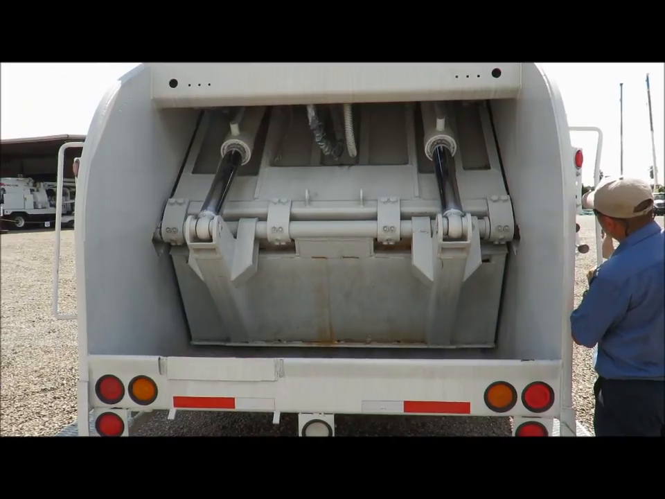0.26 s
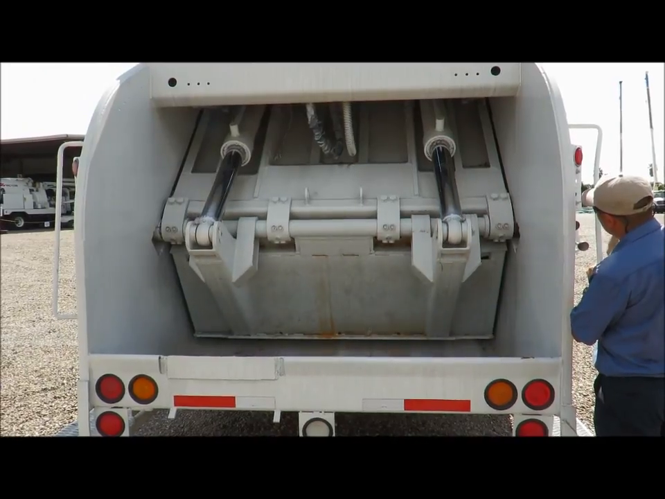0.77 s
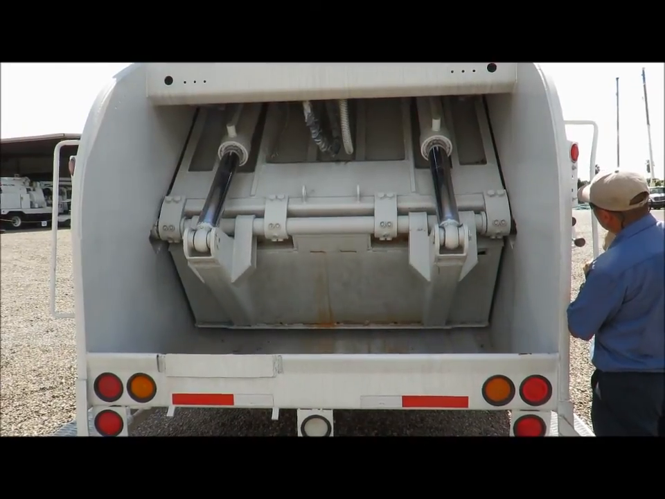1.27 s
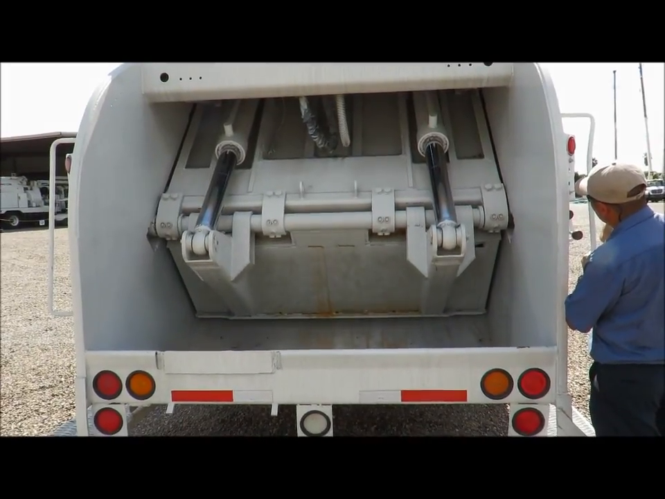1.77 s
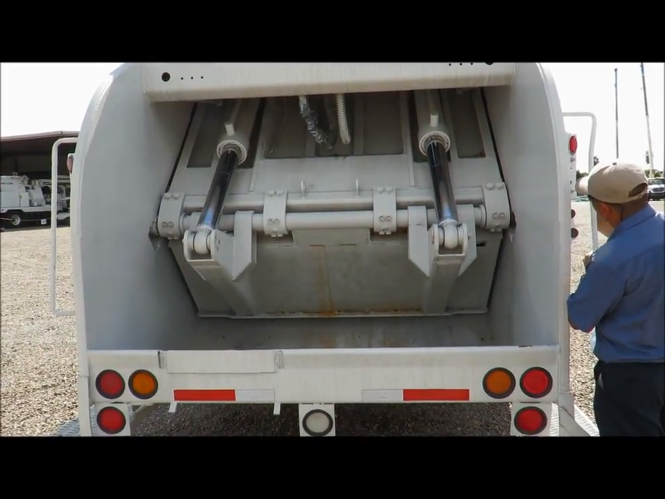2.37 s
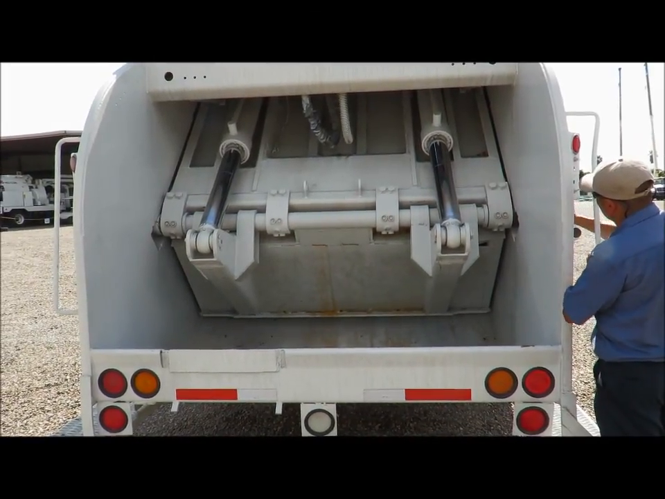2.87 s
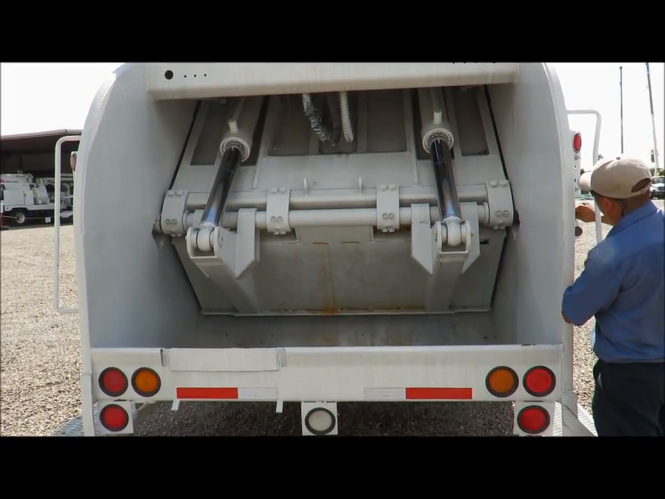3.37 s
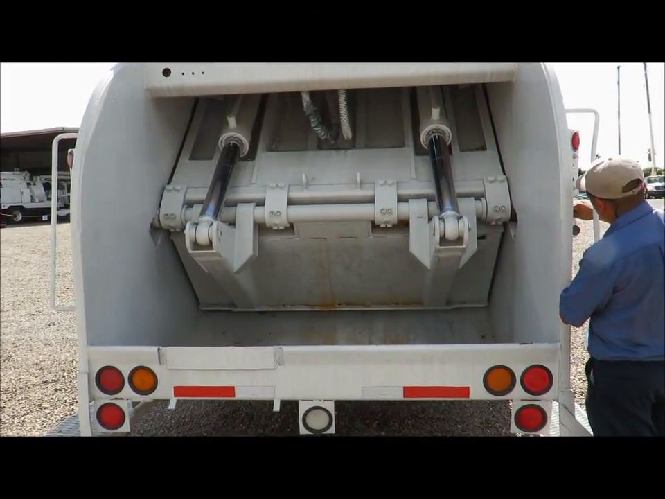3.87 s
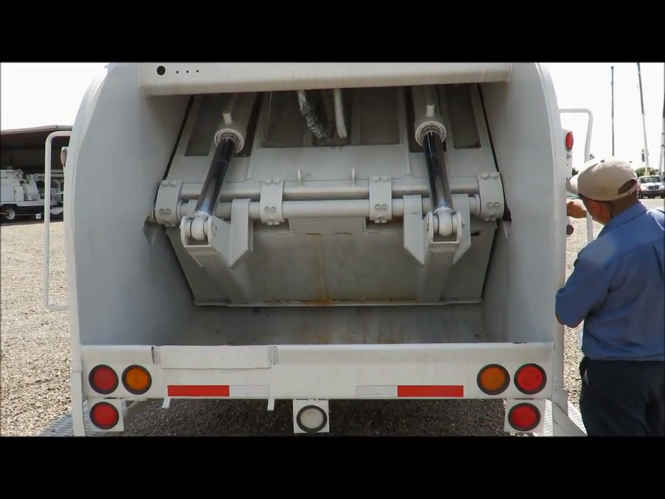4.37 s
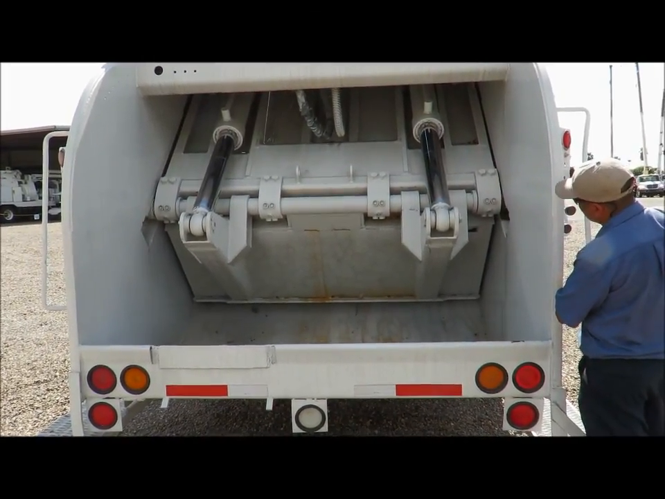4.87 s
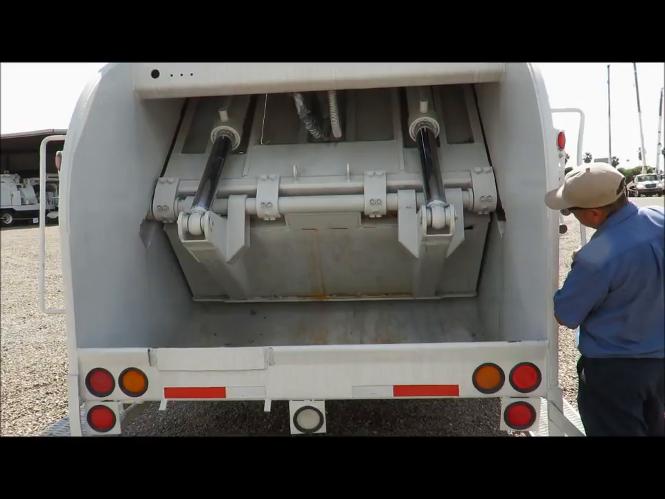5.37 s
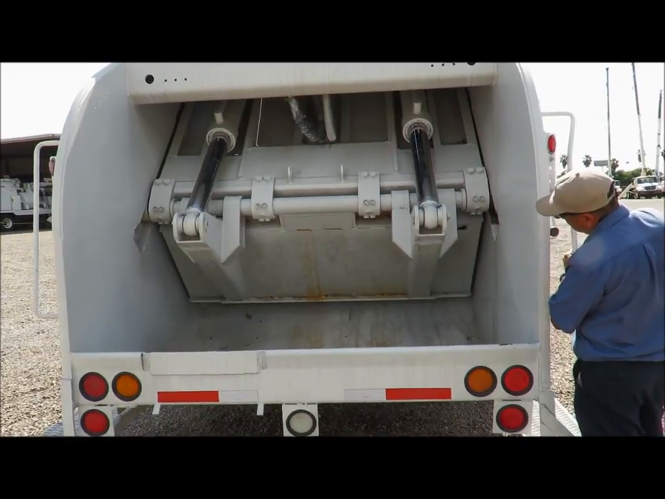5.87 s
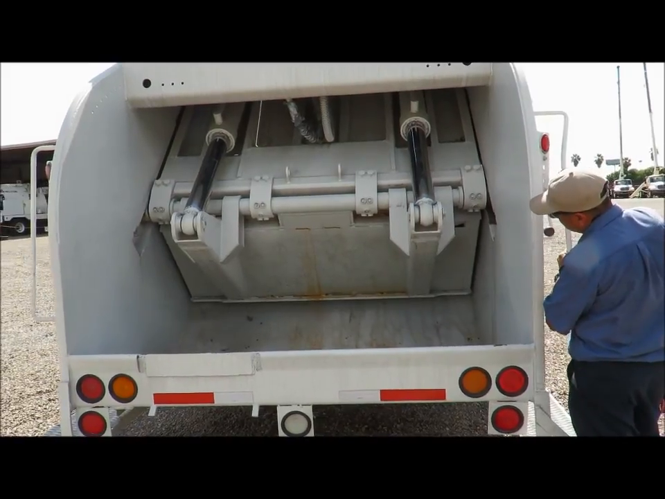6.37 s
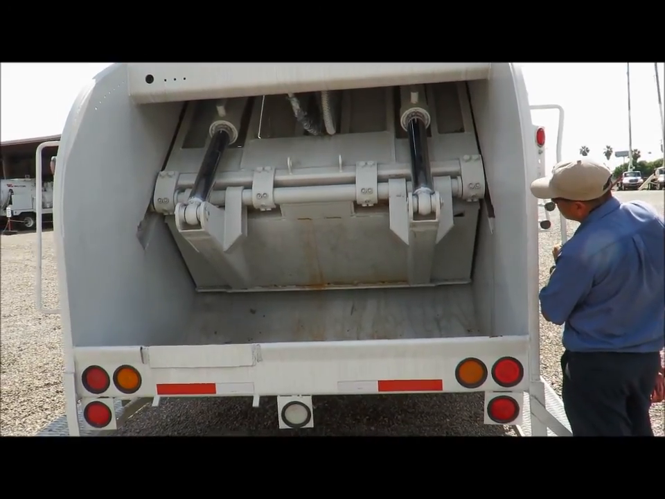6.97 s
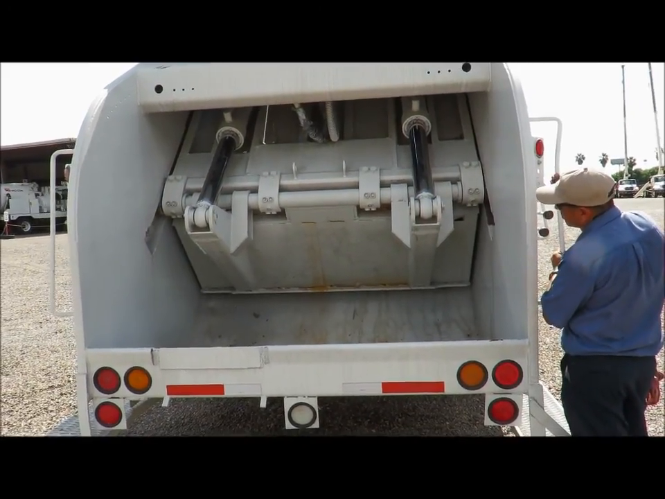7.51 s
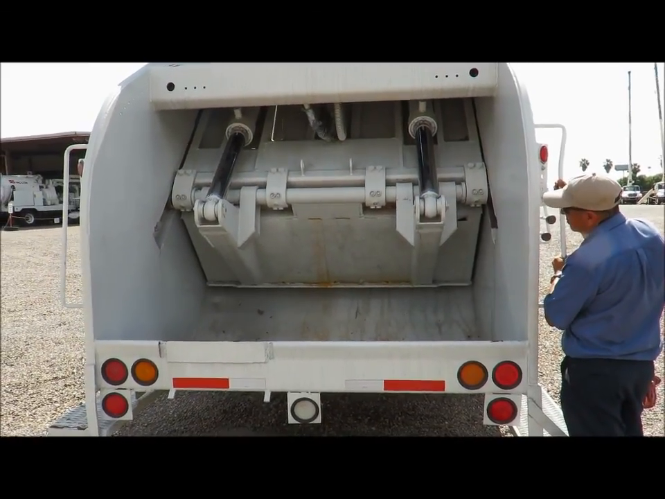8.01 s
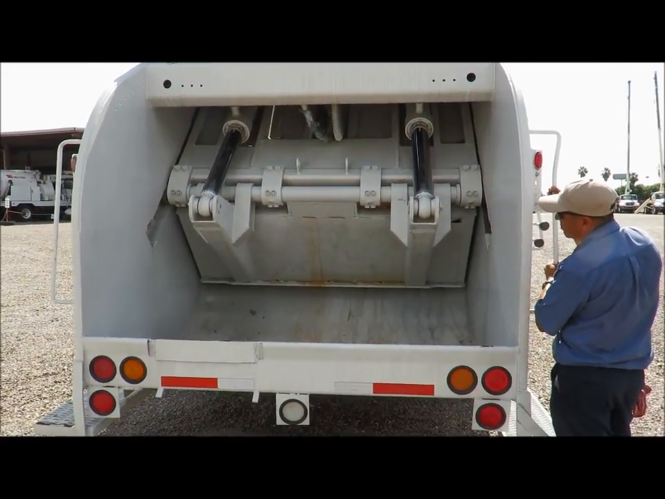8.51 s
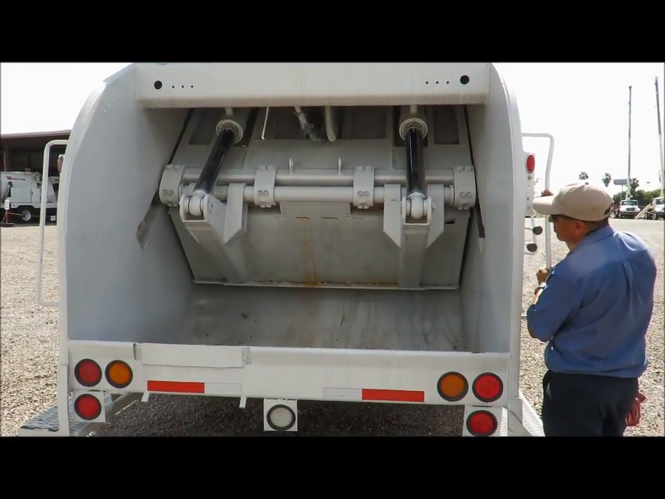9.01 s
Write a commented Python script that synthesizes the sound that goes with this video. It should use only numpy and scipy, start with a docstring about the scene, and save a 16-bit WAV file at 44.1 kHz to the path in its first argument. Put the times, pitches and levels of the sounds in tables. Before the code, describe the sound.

A steady low engine rumble and pump hum fill an open yard, heard from a few metres behind the truck. Metal knocks build to a loud hopper clank and hissing oil, then a lighter knock, another bright crash and a rough scraping groan. Afterwards the drone settles and continues evenly, broken by a single soft body thud, with small high bird chirps faint above it.

```python
"""A diesel at raised idle drives a droning hydraulic pump, heard behind a rear-loading garbage truck. Pump and
engine are harmonic series locked to one shaft, with broadband rumble, clatter and oil flow. Turbulent oil
hisses and whistles through valves; the packer blade strikes the steel hopper (shaped noise bursts) in two main
groups of clanks. Near 3.7 s a groan swells out of scraping noise and fades back (a gliding harmonic series in
noise). Dull body thuds are decaying sines, and a small bird chirps in the yard as frequency-swept sines."""
import sys
import numpy as np
from scipy import signal
from scipy.fft import rfft, irfft, next_fast_len
from scipy.io import wavfile
from scipy.ndimage import uniform_filter1d, map_coordinates

SR = 44100
rng = np.random.default_rng(int(sys.argv[2]) if len(sys.argv) > 2 else 0)


def dump(signal):
    """Clip the signal to [-1, 1] and save it as 16-bit WAV at the path in sys.argv[1]."""
    limited = np.clip(np.atleast_2d(signal).T, -1, 1)
    pcm = np.round(limited * 32767).astype(np.int16)
    wavfile.write(sys.argv[1], SR, pcm)


N = 407925
TOP_HZ = 15750  # upper band limit


def amp(db):
    """Level definition: decibels to amplitude gain."""
    return 10 ** (np.asarray(db) / 20)


def unit(x):
    """Normalisation: scale to rms 1."""
    return x / np.sqrt(np.mean(x ** 2) + 1e-20)


def clock():
    """Sampling: the time of each sample in seconds."""
    return np.arange(N) / SR


def along(points, hz):
    """Logarithmic frequency scale: interpolate (f/Hz, value) points."""
    f, v = np.transpose(points)
    return np.interp(np.log(hz + 1), np.log(f + 1), v)


def curves(rows):
    """Linear interpolation in time: one signal for each column after t/s."""
    s, *columns = np.transpose(rows)
    return [np.interp(clock(), s, column) for column in columns]


def wobble(rate):
    """Band-limited random fluctuation: a smooth curve through `rate` random knots a second."""
    knots = rng.standard_normal(1024)
    coarse = clock()[::64]
    smooth = map_coordinates(knots, [coarse * rate], mode="mirror")
    return np.interp(clock(), coarse, smooth)


def angle(hz):
    """Phase is the time integral of a moving frequency."""
    return 2 * np.pi * np.cumsum(hz) / SR


def tone(phase, waver):
    """Quadrature modulation: a sine of rms about 1 whose strength and phase waver."""
    start = rng.uniform(0, 2 * np.pi)
    in_phase = (1 + waver * wobble(17)) * np.sin(phase + start)
    quadrature = waver * wobble(17) * np.cos(phase + start)
    return np.sqrt(2) * (in_phase + quadrature)


def held(t, length, rise, t60):
    """Exponential decay: a straight rise, a hold until length, then a fall of 60 dB in t60."""
    return np.clip(t / rise, 0, 1) * amp(-60 * np.maximum(t - length, 0) / t60)


def filtered(x, response):
    """Linear filtering: the spectrum of x times a frequency response."""
    n = x.shape[-1]
    m = next_fast_len(n + 8192)
    return irfft(rfft(x, m) * response(np.fft.rfftfreq(m, 1 / SR)), m)[..., :n]


def colour(points):
    """Spectral envelope: a response through (f/Hz, level/dB) points."""
    return lambda hz: amp(along(points, hz))


def tilted(response, tilt_db):
    """Spectral tilt: a response changed by tilt_db per octave."""
    return lambda hz: response(hz) * amp(tilt_db * np.log2(hz + 20))


def speckled(response, depth_db, spacing_hz):
    """Modal density: a response with the many narrow peaks and dips of a steel body."""
    knots = rng.standard_normal(4096)
    return lambda hz: response(hz) * amp(depth_db * np.interp(hz / spacing_hz, np.arange(len(knots)), knots))


# left-right likeness of diffuse sound: f/Hz, correlation (1 = mono)
LIKENESS = [(60, .998), (200, .99), (550, .96), (1650, .92), (5000, .76), (15000, .45)]


def noise(response, size, width=1):
    """Diffuse-field correlation: coloured stereo noise of rms 1, near mono in the bass."""
    def spread(hz):
        turn = width * np.arccos(np.clip(along(LIKENESS, hz), -1, 1)) / 2
        return response(hz) * np.array([np.cos(turn), np.sin(turn)])
    mid, side = filtered(rng.standard_normal((2, size)), spread)
    return unit(np.array([mid + side, mid - side]))


# bird phrases: t/s at the top of the first note, number of notes, level/dB,
# drop per note as a share of the first pitch
BIRD_PHRASES = [(.016, 2, -40, .085), (.457, 2, -41, 0.11), (1.015, 2, -43, .12), (2.507, 3, -51, .08),
                (3.11, 1, -45.5, 0), (3.917, 2, -49.5, .13), (5.169, 2, -44, 0.11), (5.625, 3, -44, .03),
                (6.344, 2, -45, 0.11), (6.897, 3, -46.5, 0.1), (7.584, 2, -42.5, .11),
                (8.018, 3, -42.5, 0.056), (8.617, 3, -43.5, .02), (9.203, 1, -41.5, 0)]
# shape of one note: t/s from its top, share of the top pitch, level/dB
BIRD_NOTE = [(-.048, .6, -20), (-.034, .66, -1), (-.021, .73, -1), (-.012, .9, -6), (-.004, 1, -1),
             (.006, .99, -2), (.017, .88, -8), (.032, .7, -18)]
BIRD_HZ, NOTE_GAP_S = 6045, .096  # top of a first note before quaver; spacing of the notes
LAST_NOTE_DB, FLUTTER_DB = -4, 2  # a third note is weaker; random flutter within a note
BIRD_ECHO_DB, BIRD_ECHO_T60_S = -1, 0.12


def bird():
    """Frequency modulation: arched whistles in groups of one to three, with a diffuse echo from the yard."""
    song = np.zeros(N)
    when, share, shape_db = np.transpose(BIRD_NOTE)
    t = np.arange(when[0], when[-1], 1 / SR)
    arch = uniform_filter1d(np.interp(t, when, share), size=300)
    for s, notes, db, drop in BIRD_PHRASES:
        for k in range(round(notes)):
            quaver = 1 + 0.015 * np.sin(2 * np.pi * rng.uniform(180, 320) * t)
            flutter = signal.resample(rng.standard_normal(size=16), len(t))
            level_db = db + LAST_NOTE_DB * (k == 2) + np.interp(t, when, shape_db) + FLUTTER_DB * flutter
            pitch_hz = BIRD_HZ * (1 - drop * k) * arch * quaver
            note = amp(level_db) * np.sin(angle(pitch_hz))
            song += np.interp(clock(), s + k * NOTE_GAP_S + t, note, left=0, right=0)
    # the echo is a decaying noise tail, different in each ear
    tail = rng.standard_normal((2, SR // 2)) * amp(-60 * clock()[:SR // 2] / BIRD_ECHO_T60_S)
    echo = signal.fftconvolve(song[None], tail / np.linalg.norm(tail[0]), axes=1)
    return song + amp(BIRD_ECHO_DB) * echo[:, :N]


# dull thuds of the body: t/s, level/dB, f/Hz, decay t60/s
BODY_THUDS = [(1.661, -14, 324, 0.33), (1.681, -29.5, 68.7, 0.62), (3.271, -22.5, 61.7, 0.32),
              (6.612, -10.5, 106.5, 0.2)]


def thuds():
    """Damped free vibration: shifts of load set a large panel swinging for a moment."""
    out = np.zeros(N)
    for s, db, hz, t60 in BODY_THUDS:
        age = np.maximum(clock() - s, 0)
        swing = tone(2 * np.pi * hz * age, waver=0.12)
        out += amp(db - 60 * age / t60) * (1 - np.exp(-age / .012)) * swing
    return out


# spectrum of the oil jet: f/Hz, relative level/dB per Hz
OIL_JET = [(350, -29.5), (700, -5), (1200, -6.5), (2200, -3), (3200, -6), (4500, -9), (6300, -11.5),
           (7500, -12.5), (12000, -12), (14500, -14.5), (15700, -20.5)]
# valve openings: start t/s, end t/s, level/dB, die-away t60/s, tilt/dB per octave
VALVE_OPENINGS = [(0, 0.203, -50.5, .58, 1), (1.711, 1.77, -37, .11, -1.5), (1.766, 2.043, -30, 0.56, 0),
                  (2.858, 2.957, -44.5, .94, 0.5), (3.069, 3.183, -46.5, .2, 0),
                  (3.171, 3.351, -36.5, .13, -1), (3.301, 3.336, -22.5, .16, 3),
                  (3.492, 3.868, -34.5, .15, -0.2), (3.988, 4.144, -53, 0.18, 3)]
VALVE_RISE_S = 0.035


def valves():
    """Turbulent jet noise: oil forced through the spool hisses, then dies as the pressure falls."""
    out, t = np.zeros((2, N + SR)), np.arange(SR) / SR
    jet = speckled(colour(OIL_JET), depth_db=3.0, spacing_hz=114.6)
    for start, end, db, t60, tilt_db in VALVE_OPENINGS:
        opening = amp(db) * held(t, end - start, VALVE_RISE_S, t60)
        hiss = noise(tilted(jet, tilt_db), SR, width=.65)
        out[:, max(round(start * SR), 0):][:, :SR] += opening * hiss
    return out[:, :N] * amp(0.93 * wobble(27))


# oil whistling at the valve edge: start t/s, end t/s, start f/Hz, end f/Hz, level/dB
EDGE_WHISTLES = [(1.698, 1.77, 14360, 14600, -43), (2.892, 2.95, 14430, 14700, -42.5),
                 (3.173, 3.339, 4440, 4630, -37)]


def whistles():
    """Edge tone: a nearly shut valve sings with a fluttering pitch."""
    out, t = np.zeros(N), clock()
    for start, end, hz0, hz1, db in EDGE_WHISTLES:
        phase = angle(np.interp(t, [start, end], [hz0, hz1]) * (1 + 0.011 * wobble(900)))
        gate = np.clip(np.minimum(t - start, end - t) / 0.032, 0, 1)
        overtone = amp(-12) * (2 * hz1 < TOP_HZ) * np.sin(2 * phase)
        out += amp(db + 1.5 * wobble(110)) * gate * (np.sin(phase) + overtone)
    return out


# hopper plate resonances: centre f/Hz, width f/Hz, level/dB
HOPPER_PLATES = [(480, 140, -13), (717, 87, 3.5), (753, 32, 7.5), (1110, 52, -11.5), (1700, 60, -21.5),
                 (1870, 53, -25), (2520, 60, -22)]


def plates(hz):
    """Modal superposition: the hopper plates as a sum of damped resonances of alternating sign."""
    total = 0
    for k, (centre, width, db) in enumerate(HOPPER_PLATES):
        damping = 1j * hz * width
        total = total + (-1) ** k * amp(db) * damping / (centre * centre - hz * hz + damping)
    return total


# dense ring of the steel: f/Hz, relative level/dB per Hz
STEEL_RING = [(150, -26), (400, -3), (700, -2), (1150, -3.5), (1480, -3.5), (2050, 2.5), (2900, -7),
              (3600, -14.5), (4900, -18), (6500, -32.5), (15000, -34)]
# pitch of the groan: t/s, f/Hz
GROAN_PITCH = [(3.46, 177), (3.59, 170), (3.65, 165.5), (3.72, 163.5), (3.78, 163.5), (3.87, 167)]
# colour of the groan: f/Hz, relative level/dB of a harmonic
GROAN_BODY = [(165, -10.5), (330, -6), (495, -2), (660, 0), (820, 2.5), (985, -7), (1150, -11),
              (1310, -6.5), (1470, -8), (1640, 0), (1800, -17), (1970, -11), (2330, -8.5), (2620, -23),
              (2790, -12), (3000, -19), (3780, -23), (5000, -30)]
GROAN_S, GROAN_WIDTH_S, GROAN_DB = 3.71, 0.16, -18.5  # middle, half-length and level of its swell
SCRAPE_START_S, SCRAPE_END_S, SCRAPE_RISE_S, SCRAPE_T60_S = 3.485, 3.87, .05, 0.31
SCRAPE_DB, SCRAPE_YIELD_DB = -24.5, 13.5  # dry scraping, and how far it gives way to the groan
SCRAPE_ROUGH_DB, SCRAPE_CATCH_RATE = 3, 110  # the steel catches and slips; random knots a second


def groan(count=32):
    """Harmonic series in noise: scraping swells into a gliding groan, which fades back into scraping."""
    on = np.abs(clock() - GROAN_S) < .5
    t, hz = clock()[on], curves(GROAN_PITCH)[0][on]
    phase = angle(hz * (1 + 0.0021 * wobble(60)[on]))
    lock = np.exp(-((t - GROAN_S) / GROAN_WIDTH_S) ** 2)
    # each harmonic swells and fades as it glides across fixed resonances
    body = colour(GROAN_BODY)
    lines = sum(body(k * hz) * np.sin(k * phase + rng.uniform(0, 2 * np.pi)) for k in range(1, count))
    groaning = amp(GROAN_DB) * lock * unit(lines)
    scrape = noise(lambda f: colour(STEEL_RING)(f) + 2.0 * np.abs(plates(f)), len(t), width=.7)
    sliding = held(t - SCRAPE_START_S, SCRAPE_END_S - SCRAPE_START_S, SCRAPE_RISE_S, SCRAPE_T60_S)
    sliding = sliding * amp(SCRAPE_ROUGH_DB * wobble(SCRAPE_CATCH_RATE)[on])
    out = np.zeros((2, N))
    out[:, on] = groaning + amp(SCRAPE_DB - SCRAPE_YIELD_DB * lock ** 2) * sliding * scrape
    return out


SNAP_S, SNAP_DB, SNAP_T60_S = 3.337, -5.5, 0.016
SNAP_TILT_DB = 4.5  # brightness, dB per octave


def snap():
    """Impulsive contact: steel seats on steel with one very short, bright burst."""
    age = clock() - SNAP_S
    burst = noise(tilted(np.ones_like, SNAP_TILT_DB), N, width=.8)
    return amp(SNAP_DB) * held(age, .001, .001, SNAP_T60_S) * burst


# blade against the hopper: t/s, level/dB, plate boom level/dB against it, base ring t60/s
BLADE_BLOWS = [(1.665, -27.5, -11.5, 0.18), (1.692, -29.5, -10.5, 0.12), (1.771, -24.5, -15.5, 0.13),
               (1.985, -8, -16, .2), (2.012, -18.5, -3, .24), (2.038, -21, 2.5, 0.41), (2.6, -33, 3, 0.24),
               (2.897, -23.5, -7, .14), (3.313, -10.5, -4, 0.18), (3.334, -12.5, 4, .1),
               (3.85, -29, 8, 0.37)]
# damping of the steel: f/Hz, multiple of the base ring time
STEEL_DAMPING = [(300, 3.2), (800, 2.7), (2000, 0.99), (5000, 1.3), (12000, 0.64)]
HARD_BLOW_DB, BRIGHTENS = -11, .17  # softer blows are duller: dB per octave for each dB below a hard blow
CRACK_DB, CRACK_GROWS, CRACK_T60_S = -13.5, .8, .018  # level at a hard blow; dB per dB of force
AFTERRING_DB, AFTERRING_T60_S = -20.5, 1  # the whole hopper rings on; t60 before damping
CONTACT_S, CONTACT_SLOWS = 0.0016, 0.73  # rise of a hard blow's ring; dB of time per dB softer


def clanks():
    """Impact excitation: crack, dense steel ring with frequency-dependent damping, and plate boom."""
    out, t = np.zeros((2, N + SR)), np.arange(SR) / SR
    steel = speckled(colour(STEEL_RING), depth_db=3.5, spacing_hz=30.47)
    for s, db, boom_db, t60 in BLADE_BLOWS:
        force_db = db - HARD_BLOW_DB
        # fade every frequency band of the ring at its own rate
        struck = noise(tilted(steel, BRIGHTENS * force_db), SR, width=0.75)
        hz, age, bands = signal.stft(struck, SR, nperseg=256)
        fade_db = -60 * age / along(STEEL_DAMPING, hz)[:, None]
        decay = amp(fade_db / t60) + amp(AFTERRING_DB + fade_db / AFTERRING_T60_S)
        ring = signal.istft(bands * decay, SR, nperseg=256)[1][:, :SR]
        # the boom has a main decay and a weaker tail
        boom_decay = amp(boom_db - 60 * t / (t60 * 0.89)) + amp(boom_db - 8.0 - 60 * t / 0.5)
        boom = noise(plates, SR, width=.7) * boom_decay
        crack_db = CRACK_DB + CRACK_GROWS * force_db - 60 * t / CRACK_T60_S
        crack = amp(crack_db) * noise(np.ones_like, SR, width=.6)
        rise = 1 - np.exp(-t / (CONTACT_S * amp(-CONTACT_SLOWS * force_db)))
        out[:, round(s * SR):][:, :SR] += amp(db) * (crack + (ring + boom) * rise)
    return out[:, :N]


# exhaust lines: multiple of the crank rate, level/dB against the drone
EXHAUST_LINES = [(3, -18), (4.5, -11), (5, -19.5), (5.5, -13.5), (6, -8), (7, -18.5), (8, -16.5), (9, -8.5),
                 (11, -12.5), (12, 0.5), (13, -11.5), (15, -33.5), (18, -19.5), (24, -22.5)]
# engine rumble: f/Hz, relative level/dB per Hz
RUMBLE_SPECTRUM = [(20, -44.5), (32, -21), (55, -2.5), (100, 0), (165, 4), (260, -1.5), (330, -2.5),
                   (450, -11), (700, -43), (1500, -84)]
# engine clatter: f/Hz, relative level/dB per Hz
CLATTER_SPECTRUM = [(250, -36), (430, -11.5), (472, -7.5), (556, -8.5), (603, -6), (647, -5.5), (808, -5.5),
                    (940, -11), (1020, -12.5), (1320, -16.5), (1810, -18.5), (3130, -29), (4000, -32.5),
                    (5880, -41), (7000, -46.5), (9100, -76), (15400, -120)]
# rush of oil: f/Hz, relative level/dB per Hz
FLOW_SPECTRUM = [(2500, -28.5), (5000, -4), (7000, 0.5), (9200, 0.5), (10200, -4.5), (14000, -4),
                 (16000, -8.5)]
# slow drift of the engine's loudness: t/s, level/dB
ENGINE_DRIFT = [(0, 3.5), (.2, 3), (.7, -0.5), (1.5, -1), (1.85, 3), (2.3, -.5), (4.7, 0.4), (7.2, 0.5),
                (8.3, 2.36), (9.25, 2.5)]
HUM_REFERENCE_DB = -12.5  # level of a steady hum
# layers at the reference hum before the drift (dB), and how they dip with the hum (dB per dB)
DRONE_DB, DRONE_FOLLOW = -23.5, 0.46
RUMBLE_DB, RUMBLE_FOLLOW = -24, 0.017
CLATTER_DB, CLATTER_FOLLOW = -31, 0.18
FLOW_DB, FLOW_FOLLOW = -59.5, .35


def diesel(crank, hum_db):
    """Periodic combustion: exhaust orders, rumble, clatter and oil rush, each dipping a little with the hum."""
    drift_db, = curves(ENGINE_DRIFT)
    change_db = uniform_filter1d(hum_db - HUM_REFERENCE_DB, size=SR // 4)
    orders = sum(amp(db) * tone(k * crank, waver=.16) for k, db in EXHAUST_LINES)
    exhaust = amp(DRONE_DB + DRONE_FOLLOW * change_db) * orders
    rumble = amp(RUMBLE_DB + RUMBLE_FOLLOW * change_db) * noise(colour(RUMBLE_SPECTRUM), N)
    # valves and injectors add a faint pattern that repeats every engine cycle of two turns
    cycle = rng.standard_normal(SR // 10)
    pattern = np.interp(crank / (4 * np.pi), np.arange(len(cycle)) / len(cycle), cycle, period=1)
    body = speckled(colour(CLATTER_SPECTRUM), depth_db=2.0, spacing_hz=29.56)
    ticking = unit(noise(body, N) + 0.16 * unit(filtered(pattern, body)))
    firing = unit(1 + 0.042 * np.cos(3 * crank) + 0.019 * np.cos(crank) + 0.071 * np.cos(10 * crank))
    clatter = amp(CLATTER_DB + CLATTER_FOLLOW * change_db) * firing * ticking
    flow = amp(FLOW_DB + FLOW_FOLLOW * change_db) * noise(colour(FLOW_SPECTRUM), N)
    return amp(drift_db) * (exhaust + rumble + clatter + flow)


# hum overtones at the reference hum: t/s, second harmonic level/dB, third harmonic level/dB
HUM_OVERTONES = [(0, -23.5, -34.5), (.6, -27.5, -35), (.8, -38.5, -41), (1.15, -27.5, -33),
                 (1.55, -27, -43.5), (2.6, -35.5, -57.5), (3.15, -24, -32.5), (4.1, -37, -36.5),
                 (4.8, -25.5, -40), (6.25, -28.5, -34.5), (6.7, -37, -51), (7.8, -50, -37),
                 (9.25, -30.5, -38.5)]
# upper pump whine: multiple of the tooth rate, level/dB against the third harmonic
PUMP_WHINE = [(3, 2), (4, -12.5), (5, -8.5), (6, -19.5), (7, -21), (9, -21.5), (12, -23), (14, -27)]
OVERTONE_FOLLOW, OVERTONE_WANDER_DB = .6, 1.5  # dB per dB of hum; unsteadiness
WHINE_UNDER_DB = 10  # the whine's reference stays at least this far below the tooth tone
HUM_WANDER_DB, HUM_WANDER_RATE = 0.98, 6  # slow unsteadiness of the hum; random knots a second


def pump(tooth, hum_db):
    """Gear-mesh harmonics: each tooth sends a pressure pulse into the truck body; overtones follow the hum."""
    change_db = OVERTONE_FOLLOW * (hum_db - HUM_REFERENCE_DB)
    second_db, third_db = [db + change_db + OVERTONE_WANDER_DB * wobble(HUM_WANDER_RATE)
                           for db in curves(HUM_OVERTONES)]
    hum = amp(hum_db) * tone(tooth, waver=0.037) + amp(second_db) * tone(2 * tooth, waver=0.2)
    # the whine weakens together with the tooth tone
    whine_db = np.minimum(third_db, hum_db - WHINE_UNDER_DB)
    whine = sum(amp(db) * tone(k * tooth, waver=0.15) for k, db in PUMP_WHINE)
    return hum + amp(whine_db) * whine


# shaft speed, with sags and overshoots around the main blows: t/s, pump tooth rate f/Hz
TOOTH_RATE = [(0, 199), (1.8, 199.2), (2.1, 196.8), (2.4, 201.1), (2.65, 202), (3, 199.9), (3.2, 195),
              (3.32, 190), (3.6, 204.7), (3.8, 206.3), (4.4, 201.9), (5.1, 199.4), (6, 198.6), (6.6, 199.6),
              (9.25, 199.8)]
# level of the pump's hum, dipping after the loud clanks: t/s, tooth tone level/dB
HUM_LEVEL = [(0, -18), (.13, -20), (.48, -11.5), (1.65, -13), (1.97, -14.5), (2.06, -30), (2.52, -28.5),
             (2.78, -21.5), (2.94, -11.5), (3.1, -19.5), (3.3, -17.5), (3.38, -36.5), (3.6, -29.5),
             (3.84, -22), (3.98, -26.5), (4.06, -18), (4.33, -15.5), (4.44, -23), (4.6, -13.5), (5.6, -15),
             (6.25, -11), (6.5, -14), (9.25, -13.5)]


def scene():
    """Superposition: pump and engine share one shaft (ten teeth a turn); the pump sits slightly right."""
    tooth = angle(curves(TOOTH_RATE)[0])
    hum_db = curves(HUM_LEVEL)[0] + HUM_WANDER_DB * wobble(HUM_WANDER_RATE)
    drone = pump(tooth, hum_db) * amp([[-.45], [.45]]) + diesel(tooth / 10, hum_db)
    return drone + valves() + whistles() + groan() + clanks() + snap() + thuds() + bird()


def record(dry):
    """Soft saturation and band limiting: round off the highest peaks, keep nothing from TOP_HZ up."""
    rounded = dry / (1 + np.abs(dry) ** 8) ** (1 / 8)
    return filtered(rounded, lambda hz: hz < TOP_HZ)


dry = scene()
out = record(dry)
dump(out)
```